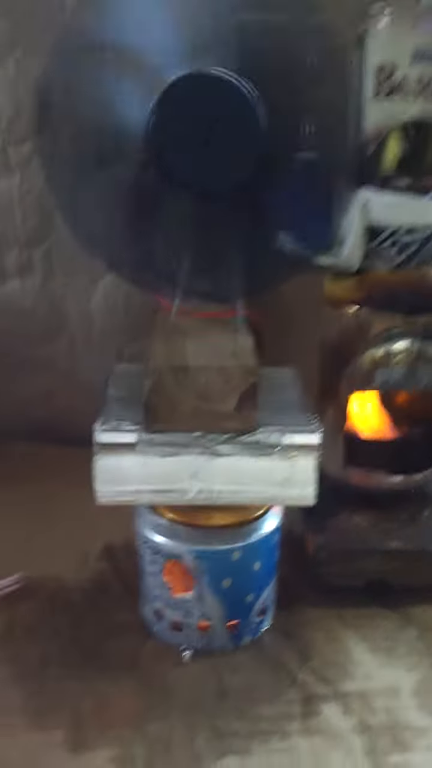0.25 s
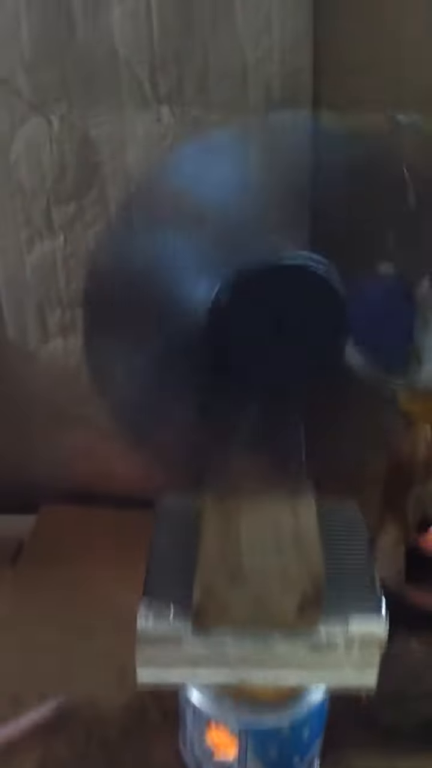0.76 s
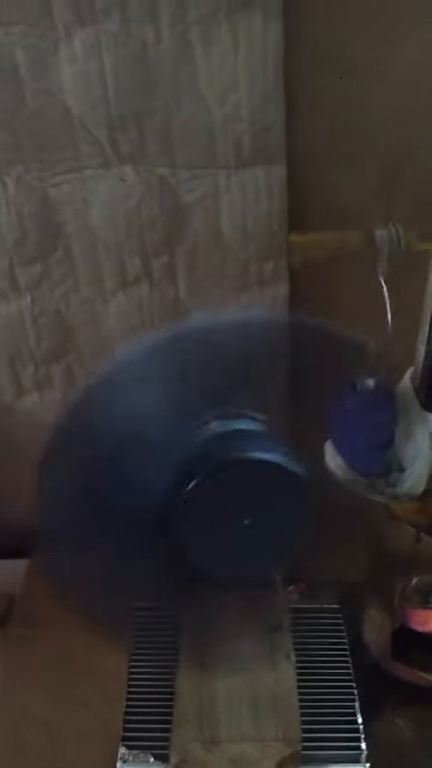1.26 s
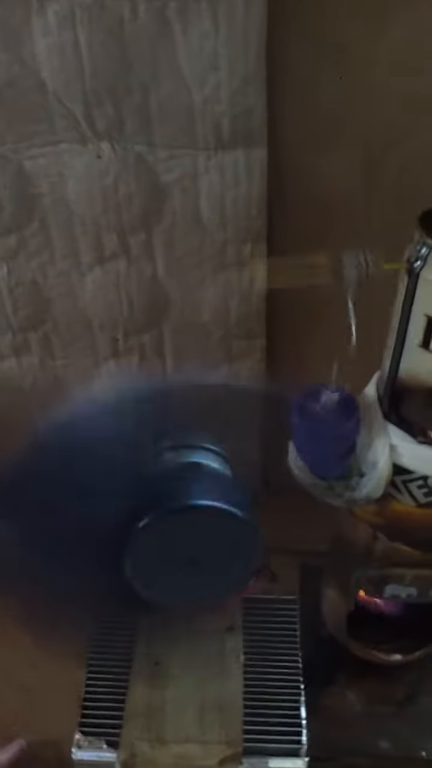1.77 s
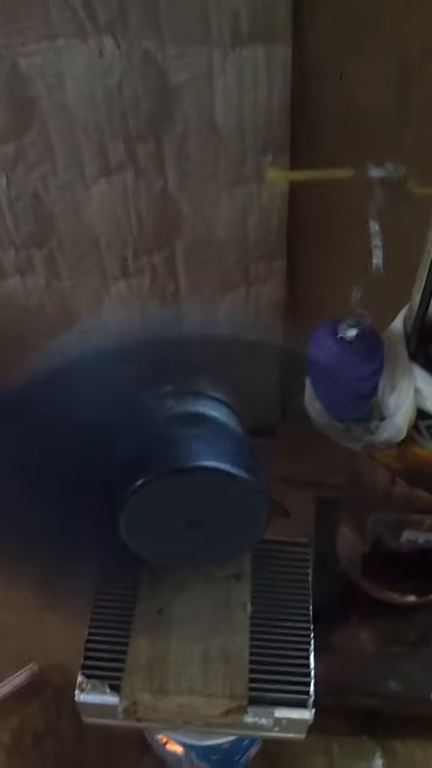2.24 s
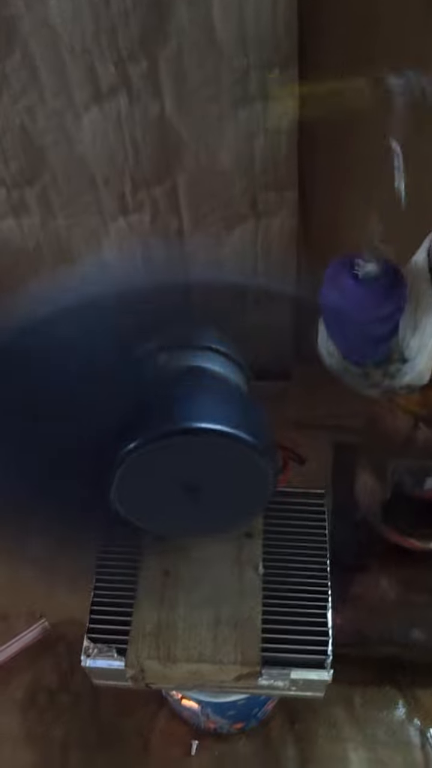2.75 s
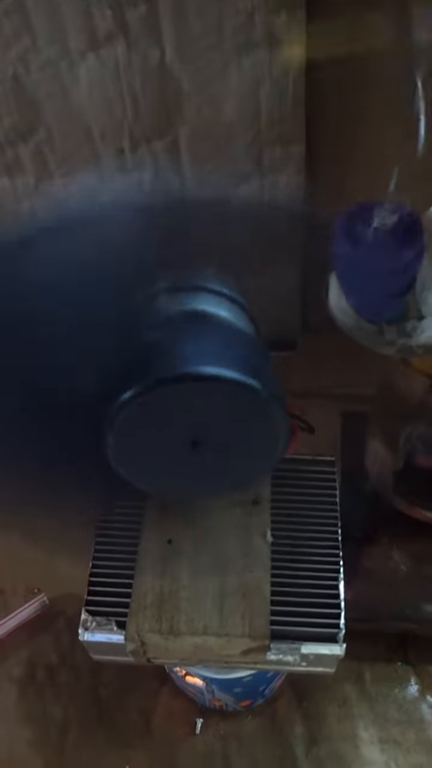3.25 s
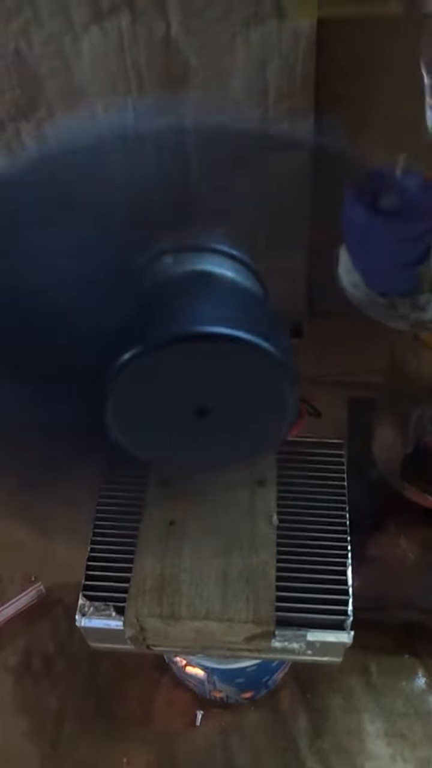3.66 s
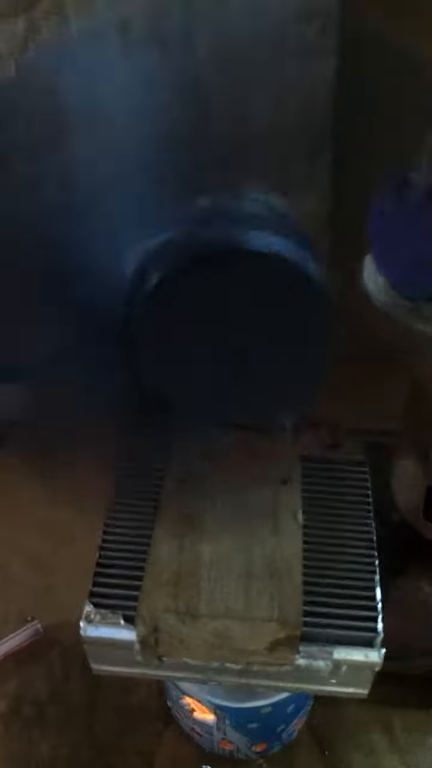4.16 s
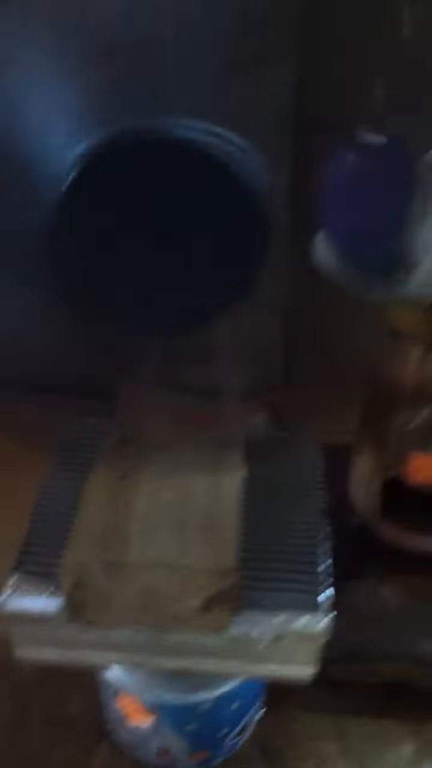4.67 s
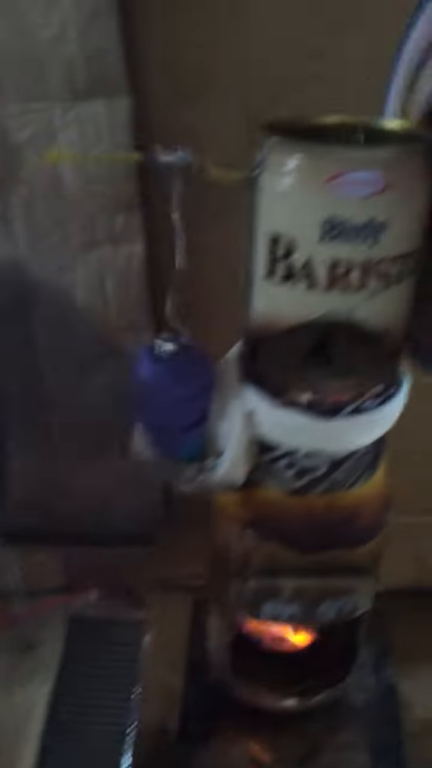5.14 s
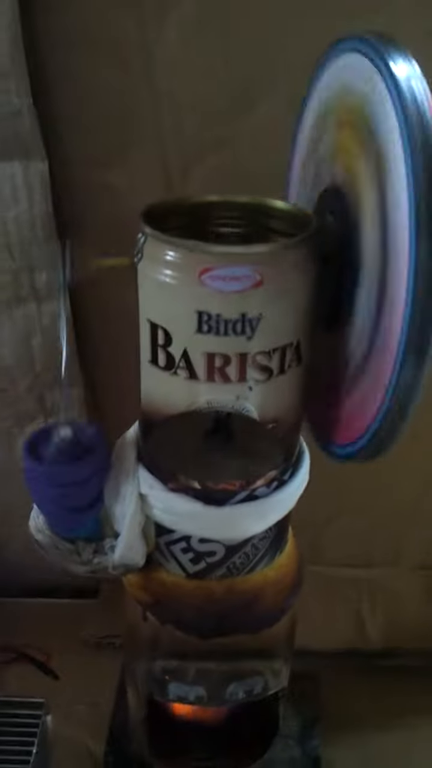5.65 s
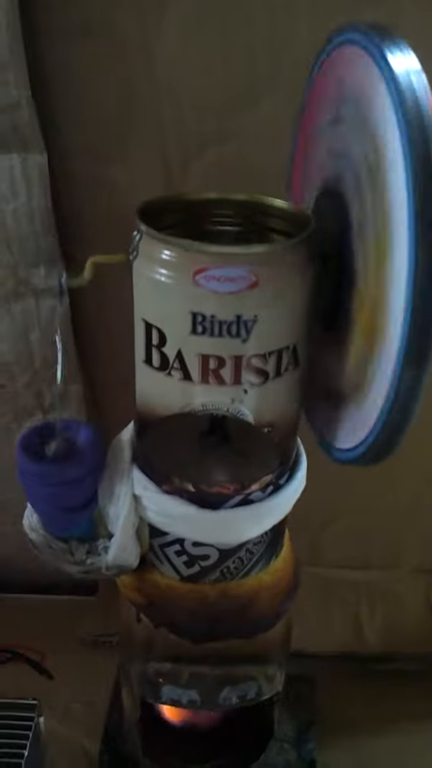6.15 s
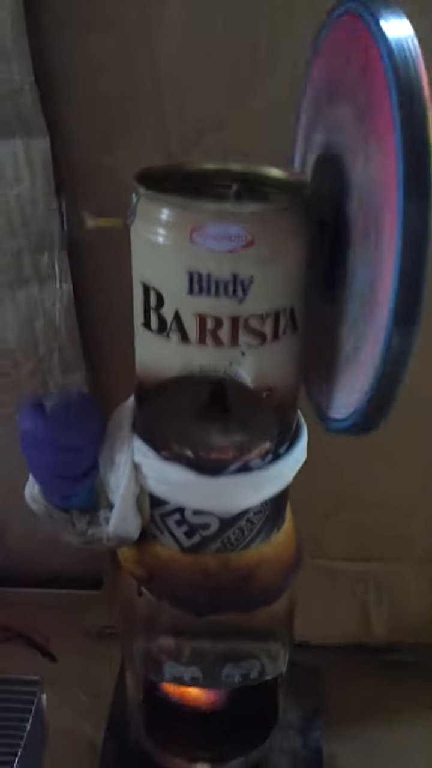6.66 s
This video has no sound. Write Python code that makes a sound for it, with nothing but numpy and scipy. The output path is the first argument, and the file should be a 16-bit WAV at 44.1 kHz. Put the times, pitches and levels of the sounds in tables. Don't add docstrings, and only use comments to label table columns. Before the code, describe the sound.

A tiny homemade engine clatters at about eight metallic knocks a second, thin and rattly, close up, over soft air and a low fan hum.

```python
import sys
import numpy as np
from scipy import signal
from scipy.io import wavfile
from scipy.ndimage import uniform_filter1d

SR = 44100
rng = np.random.default_rng(int(sys.argv[2]) if len(sys.argv) > 2 else 0)


def voltage_ratio(level):
    return 10 ** (np.asarray(level, float) / 20)


def generate_wav(sig):
    pcm = np.round(np.clip(np.atleast_2d(sig).T, -1, 1) * 32767).astype(np.int16)
    wavfile.write(sys.argv[1], SR, pcm)


N = 304731

# (frequency [Hz], width [Hz], level [dB], left minus right [dB])
KNOCK_MODES = [(1268, 160, -9.5, 35), (2010, 170, -5, 0.5), (1544, 290, -8.5, 4), (3490, 524, 0.5, -4.5),
               (3800, 170, -3, 2), (4113, 170, 4, -6), (4733, 576, -4.5, -17), (5157, 540, -0.5, -6),
               (5970, 1640, -11, -14), (9620, 1050, -12.5, 4), (10380, 636, -0.5, 37), (11150, 330, -2, 25),
               (12400, 1700, -12, 17), (14440, 2800, -12, 11)]
# (frequency [Hz], width [Hz], level [dB], left minus right [dB])
TICK_MODES = [(1314, 516, 6, -2.5), (2035, 217, 8, -3), (3800, 570, 2.5, 1.5), (4550, 330, 9.5, -8.5),
              (5490, 620, 2, -5.5), (8670, 540, -15, 11.5), (11130, 900, 0, 28), (11490, 1030, 0, 14),
              (12900, 300, -5.5, 8), (15400, 900, -8.5, 12)]
# (frequency [Hz], width [Hz], level [dB], left minus right [dB])
SNAP_MODES = [(1200, 260, -6, 4), (1700, 200, -3, 3), (1420, 300, -7, 2), (3400, 400, -6, -1),
              (4220, 220, 0, -5), (5600, 400, -1, -12), (4900, 1500, -5, -7), (7900, 600, -2, 8),
              (10800, 2500, 0, 19), (13500, 1500, -8, 14)]
# (wire rise [s], rise [s], burst [s], tail [s], tail level [dB],
# bounces (time later [s], level [dB]))
FALL_BACK = (.001, .0005, .0017, .012, -18, [(.006, -14)])


def crank():
    touch, knock, rub, back, snap = turns()
    snap = snap[:-1]
    tick = knock - [.0024, 7.0, 0, 0]
    rattle = chatter(uneven_db=3.5, bounce_db=2.5, bounce_rate=260)
    scrape = chatter(uneven_db=5.0, bounce_db=-4.0, bounce_rate=61)

    touch_shape = blow(0.0026, 0.0013, 0.0062, 0.0068, -34.0)
    tick_shape = blow(0.0013, .1, 0.0036, 0.0061, -4)
    knock_shape = blow(0.0004, 0.00089, 0.0027, 0.02, -16.5, [(.0265, -21)])
    snap_shape = blow(0.00056, 0.00037, 0.0023, 0.0064, -11.0, [(.009, -9.5), (.019, -13.5)])

    out = contact(touch, TICK_MODES, touch_shape, rattle, trim_db=(15, 13, 13))
    out += contact(tick, [(12000, 940, 0, 15)], tick_shape, rattle, trim_db=(12, 0, 0))
    out += contact(knock, KNOCK_MODES, knock_shape, rattle, trim_db=(16.3, 15, 19))
    out += contact(back, TICK_MODES, blow(*FALL_BACK), rattle, trim_db=(19, 16, 15))
    out += contact(snap, SNAP_MODES, snap_shape, rattle, trim_db=(10, 14, 17))
    out += contact(rub, KNOCK_MODES, stroke(length_s=.06), scrape, trim_db=(8, 9, 12))

    snaps = snap[:, 0]
    flaps = np.concatenate([snaps + 0.001007, snaps + .0098, snaps + .0205])
    flaps = flaps + rng.normal(0, .0007, len(flaps))
    wire_view_db = in_time(VIEW)[0]
    out += voltage_ratio(.5 * wire_view_db) * thuds(flaps, hz=1210, width=240, level_db=13, pan_db=11.0)

    out += thuds(back[:, 0] - .002, hz=258, width=117, level_db=15, pan_db=8.5)
    knocks = knock[:, 0]
    pushes = np.concatenate([knocks - .003, knocks + 0.013, knocks + 0.031])
    return out + thuds(pushes, hz=710, width=960, level_db=-17, pan_db=0.0)


# (turns made [turns], time the diaphragm snaps over [s])
FLYWHEEL = [(0, .0806), (14, 1.8377), (28, 3.5575), (42, 5.2465), (55, 6.7906)]
# (time [s], blow [dB], slide [dB], fall back [dB])
SQUARE = [(0.0168, -7.5, -25, -20), (0.1447, -10.5, -38, -20), (0.271, -7.5, -29, -23),
          (0.396, -7.5, -26, -25), (0.9022, -11, -23, -18), (1.0275, -6.5, -27, -20),
          (1.1522, -10, -19, -17.5), (1.402, -8.5, -35, -21.5), (1.6515, -10, -34, -21),
          (2.5156, -6.5, -16.5, -17.5), (2.7611, -5.5, -24, -18), (2.8833, -5.5, -16.5, -17.5),
          (3.007, -6, -19.5, -18.5), (3.1298, -7, -28, -18.5), (3.2522, -4.5, -28, -22),
          (3.495, -7, -25, -18), (3.6166, -7, -33, -17.5), (3.859, -6, -25, -19), (3.9809, -8, -22, -21),
          (4.3443, -9, -30, -21), (4.4642, -10.5, -22, -17.5), (4.585, -10, -20, -20),
          (4.706, -3.5, -33, -17.5), (5.0659, -5, -36, -20), (5.4238, -9.5, -37, -20.5),
          (6.0187, -13, -22, -18.5), (6.1372, -8.5, -34, -19), (6.257, -5, -31, -18),
          (6.3756, -11.5, -20, -20), (6.7293, -5.5, -26, -22)]
# (time [s], blow [dB], slide [dB], fall back [dB])
GLANCING = [(0.524, -9.5, -38, -22.5), (0.6497, -1.5, -24, -19.5), (.7756, -8.5, -31, -23.5),
            (1.2775, -5, -20.5, -18), (1.528, -12, -27, -20), (1.775, -4, -16, -19.5),
            (1.899, -12.5, -23, -23.5), (2.0225, -4, -25, -19.5), (2.1475, -4, -29.5, -25.5),
            (2.2694, -4, -35, -21.5), (2.3935, -2, -20, -19.5), (2.639, -12.5, -26, -18),
            (3.373, -1.5, -17.5, -16.5), (3.738, -12, -20, -18), (4.103, -12, -24, -18.5),
            (4.225, -9, -20, -19), (4.8268, -12, -19.5, -20.5), (4.9464, -8, -22, -20.5),
            (5.185, -10, -23, -21.5), (5.3066, -8, -38, -20), (5.5433, -4, -26.5, -23),
            (5.6627, -9, -28, -22), (5.783, -7.5, -20, -19.5), (5.9006, -15.5, -24, -22.5),
            (6.4937, -7, -26, -23), (6.6117, -8.5, -22, -19.5), (6.8463, -10, -23, -18.5)]
# (time [s], wire [dB], can [dB], diaphragm [dB])
VIEW = [(0, -9, 0.5, 2), (.7, -4.5, 0, -5), (1.2, -3, -0.5, -1.5), (2.1, -2, -4.5, 0.5), (3, 0.5, 0.5, 0),
        (3.8, 3, 1, -2.5), (4.5, -2.5, 4.5, 0.5), (5.1, -2, 3, -0.5), (5.6, 3.5, -0.5, .5),
        (6.1, 0, 1, 2.5), (6.4, 2.5, 0, 4), (6.91, 2, 3, 3.5)]


def turns():
    square_can_db, glancing_can_db = -2.5, -6.5
    touch_lead_turns, touch_jitter_s, fall_lead_s = .557, .001, .0183
    uneven_db = 1.3

    square = [(*row, square_can_db) for row in SQUARE]
    glancing = [(*row, glancing_can_db) for row in GLANCING]
    s, blow_db, slide_db, fall_db, ring_db = np.array(sorted(square + glancing)).T
    clock = np.poly1d(np.polyfit(*np.transpose(FLYWHEEL), deg=4))
    made = np.arange(len(s))
    view_s, *views = np.transpose(VIEW)
    wire, can, skin = (np.interp(s, view_s, column) for column in views)
    luck = rng.standard_normal((len(s), 9)).T
    vary = uneven_db * luck

    touch_can = -24.0 + can + vary[1]
    touch = [clock(made - touch_lead_turns) + touch_jitter_s * luck[8],
             -18.0 + wire + 1.3 * vary[0],
             touch_can,
             touch_can - 8.0]
    knock = [s,
             blow_db,
             blow_db + ring_db,
             blow_db + 0.45 * ring_db - 9.5 + can + 0.99 * vary[2]]
    rub = [s + .021, slide_db, slide_db - 4.5, slide_db - 6.0]
    back = [clock(made) - fall_lead_s,
            fall_db - .4 - 0.13 * wire + 0.36 * vary[3],
            fall_db - .8 - 0.32 * wire - .4 * vary[3],
            fall_db - 9.0]
    snap = [clock(made),
            -33.0 + 2.1 * skin + 1.2 * vary[4] + vary[5],
            -20.0 + skin + vary[4],
            -24.5 + 0.48 * skin + 0.43 * vary[4] + 0.55 * vary[6]]
    return [np.transpose(rows) for rows in (touch, knock, rub, back, snap)]


def contact(rows, modes, shape, source, trim_db):
    base_top_hz, can_top_hz = 2600, 7400
    rows, out = np.array(rows), np.zeros((2, N))
    at = np.clip((rows[:, 0] * SR).astype(int), 0, N - 1)
    opposed = .5 * source[0] * [[1], [-1]] + 1.873 * source
    fed = []
    for part, feed in enumerate([source, source, opposed]):
        strength = np.zeros(N)
        strength[at] = voltage_ratio(rows[:, 1 + part] + trim_db[part])
        fed.append(feed * shape(strength, part))
    for hz, width, level_db, pan_db in modes:
        ports = voltage_ratio([[level_db + min(pan_db, 0)], [level_db + min(-pan_db, 0)]])
        part = int(hz < can_top_hz) + int(hz < base_top_hz)
        out += ports * resonance(fed[part], hz, width * 1.772)
    return out


def chatter(uneven_db, bounce_db, bounce_rate):
    unevenness = np.minimum(rng.exponential(1, N), 4)
    clicks = rng.standard_normal((2, N)) * voltage_ratio(uneven_db * unevenness)
    clicks = clicks * voltage_ratio(bounce_db * drift(bounce_rate))
    return clicks / np.sqrt(uniform_filter1d(clicks ** 2, size=350))


def blow(wire_rise_s, rise_s, burst_s, tail_s, tail_db, bounces=()):
    def shape(strength, part):
        struck = strength + sum(voltage_ratio(db) * np.roll(strength, int(s * SR)) for s, db in bounces)
        hit = one_pole(struck, burst_s) + voltage_ratio(tail_db) * one_pole(struck, tail_s)
        rise = rise_s if part else max(wire_rise_s, .001)
        return one_pole(hit, rise) / (rise * SR)
    return shape


def stroke(length_s):
    swell = np.hanning(int(length_s * SR))
    return lambda strength, part: signal.oaconvolve(strength, swell, "same")


def thuds(times, hz, width, level_db, pan_db):
    pushes = np.full(N, 1e-18)
    at = np.clip((times * SR).astype(int), 0, N - 1)
    pushes[at] = voltage_ratio(level_db + 2.0 * rng.standard_normal(len(times)))
    return resonance(pushes, hz, width) * voltage_ratio([[pan_db / 2], [-pan_db / 2]]) * [[1], [-1]]


# (time [s], shaft rate [turns per s])
SHAFT = [(0, 20.3), (1, 20.7), (1.8, 21.35), (2.55, 21.9), (3.1, 22.6), (3.7, 23.5), (3.95, 24),
         (4.4, 24.4), (6.91, 24.5)]
# (time [s], level [dB])
HUM = [(0, -49), (.7, -47.5), (1.2, -42.5), (1.85, -43.5), (2.15, -53.5), (2.55, -41.5), (3.1, -44.5),
       (3.7, -44.5), (3.95, -45.5), (4.4, -48), (6.91, -68)]
# (frequency [Hz], level [dB])
HUM_COLOUR = [(80, -18), (106, -7), (140, -15), (172, 1), (185, -5), (195, -1), (213, 0), (228, -7),
              (340, -12)]


def fan():
    rate, hum_db = in_time(SHAFT)[0], in_time(HUM)[0]
    phase = 2 * np.pi * np.cumsum(rate) / SR
    hum = 0
    for k, swell in enumerate(drift(1.16, channels=12), 4):
        hum = hum + voltage_ratio(at_hz(HUM_COLOUR, k * rate) + 3.7 * swell) * np.sin(k * phase + k * k)
    return voltage_ratio(hum_db + 3.5) * hum * voltage_ratio([[3.5], [-3.5]]) * [[1], [-1]]


# (frequency [Hz], width [Hz], level [dB])
AIR_TONES = [
    (555, 24, -24),
    (752, 28, -23),
]


def draught():
    white = rng.standard_normal(N)
    tones = sum(voltage_ratio(db) * resonance(white, hz, width) for hz, width, db in AIR_TONES)
    can_view_db = in_time(VIEW)[1]
    return tones * voltage_ratio(1.3 * can_view_db) * voltage_ratio(10.0) * [[1], [-.3]]


# (time [s], level [dB])
AIR = [
    (0.0, -43),
    (6.7, -44.5),
    (6.91, -39.5),
]
# (frequency [Hz], level [dB per Hz])
AIR_COLOUR = [(20, -40), (40, -21), (90, -9), (160, -3), (264, -0.5), (354, 0), (529, 5), (927, 2),
              (1670, 1.5), (2700, -7.5), (4200, -2.5), (7000, -23), (11500, -11.5), (14500, -15)]
# (frequency [Hz], left minus right [dB])
AIR_BALANCE = [(60, 8), (380, 9.5), (700, 1.5), (2400, 2), (4400, -1.5), (6500, -4), (8500, 20.5),
               (11000, 12.5)]
# (frequency [Hz], likeness [-1 to 1])
LIKENESS = [(60, -0.28), (380, -0.71), (2380, 0.041), (15000, -0.23)]


def air(patchy_db):
    out, edges = 0, 22 * 2 ** np.arange(0, 9.6, .5)
    white, flicker = rng.standard_normal((2, 2, N)), drift(11.0, channels=4)
    for k, (low, high) in enumerate(zip(edges, edges[1:])):
        band = signal.butter(2, [low, high], "band", fs=SR, output="sos")
        mid, side = signal.sosfilt(band, white[k % 2])
        hz = np.sqrt(low * high)
        alike = np.clip(at_hz(LIKENESS, hz), -1, 1)
        level_db = at_hz(AIR_COLOUR, hz) + patchy_db * flicker[k % 4]
        port_db = at_hz(AIR_BALANCE, hz) / 2 * np.array([[1], [-1]])
        ports = np.sqrt(1 + alike) * mid + np.sqrt(1 - alike) * side * [[1], [-1]]
        out = out + voltage_ratio(level_db + port_db) * ports
    return voltage_ratio(in_time(AIR)[0] + 13.0) * rms_one(out)


def resonance(x, hz, width):
    r = np.exp(-np.pi * width / SR)
    section = [(1 - r * r) / 2, 0, (r * r - 1) / 2, 1, -2 * r * np.cos(2 * np.pi * hz / SR), r * r]
    return signal.sosfilt([section, section], x)


def one_pole(x, seconds):
    return signal.lfilter([1], [1, -np.exp(-1 / (max(seconds, 1e-5) * SR))], x)


def drift(rate, channels=1):
    white = rng.standard_normal((channels, N // 16 + 2002))
    seconds = 1 / (32 * np.pi * rate)
    slow = one_pole(one_pole(white, seconds), seconds)
    slow = rms_one(slow[:, 2000:])
    return np.array([np.interp(np.arange(N) / 16, np.arange(len(row)), row) for row in slow])


def rms_one(x):
    return x / np.sqrt(np.mean(x ** 2) + 1e-20)


def in_time(rows):
    s, *columns = np.transpose(rows)
    return [np.interp(np.arange(N) / SR, s, c) for c in columns]


def at_hz(points, hz):
    point_hz, value = np.transpose(points)
    return np.interp(np.log(hz), np.log(point_hz), value)


def scene():
    return crank() + fan() + draught() + air(patchy_db=.7)


def band_limit(x):
    return signal.sosfilt(signal.butter(12, 15570, fs=SR, output="sos"), x)


def record(dry):
    overloaded = dry + 0.035 * dry ** 2
    top_cut = signal.ellip(6, .5, 30, 14550, fs=SR, output="sos")
    mix = np.clip(signal.sosfilt(top_cut, overloaded), -1, 1)
    return band_limit(mix)


dry = scene()
out = record(dry)
generate_wav(out)
```